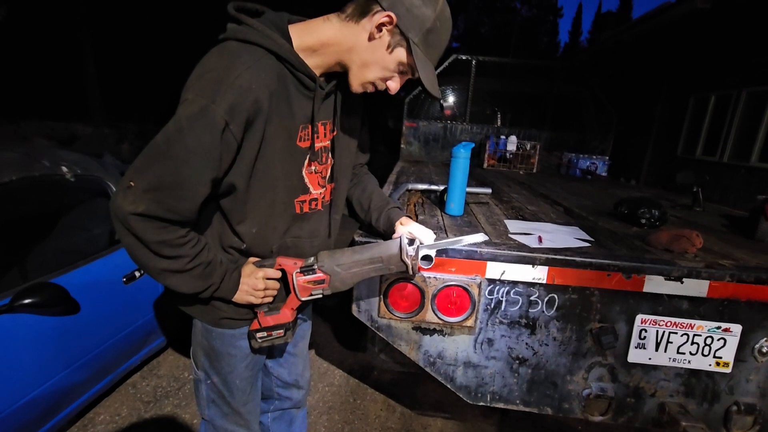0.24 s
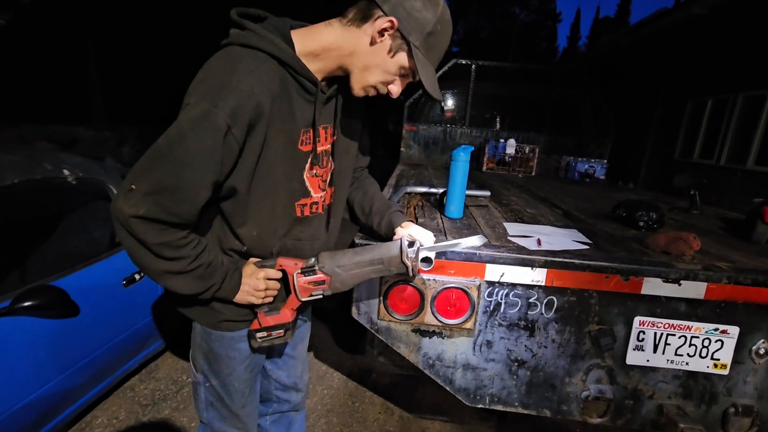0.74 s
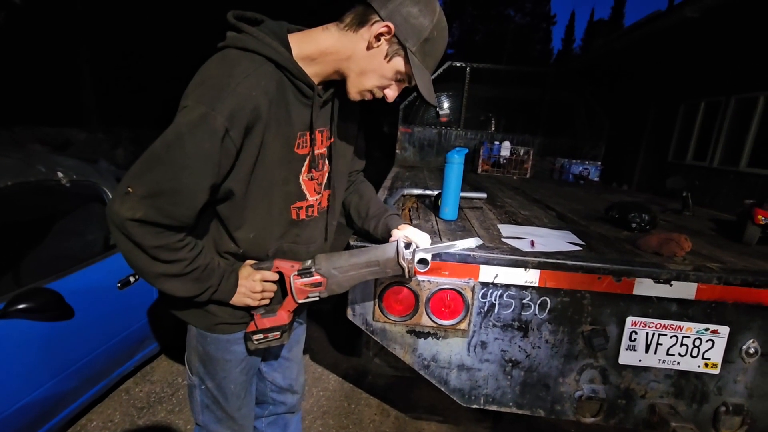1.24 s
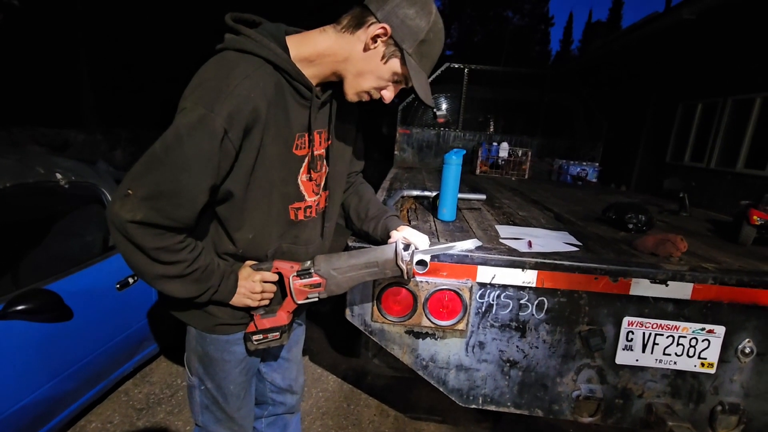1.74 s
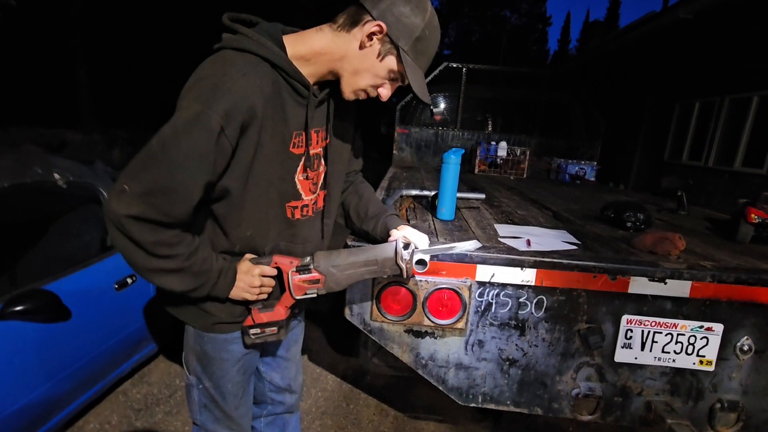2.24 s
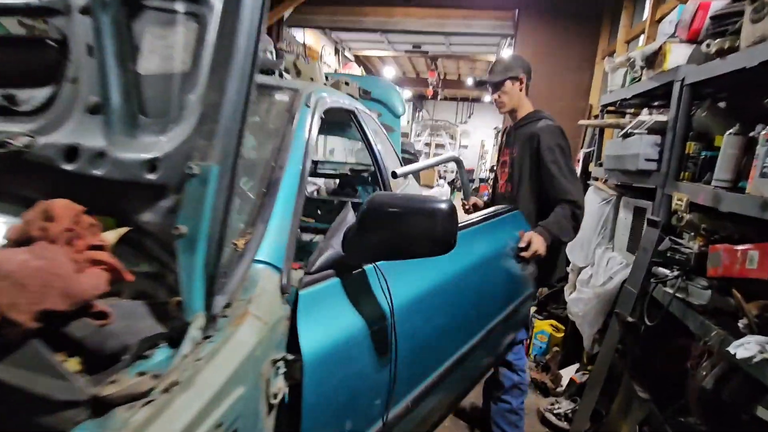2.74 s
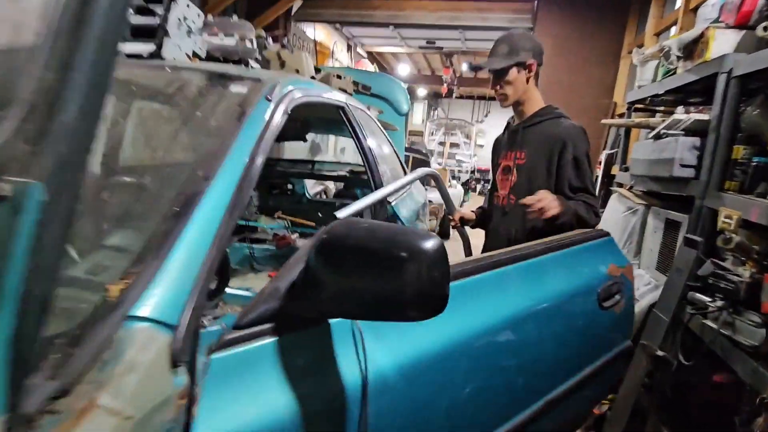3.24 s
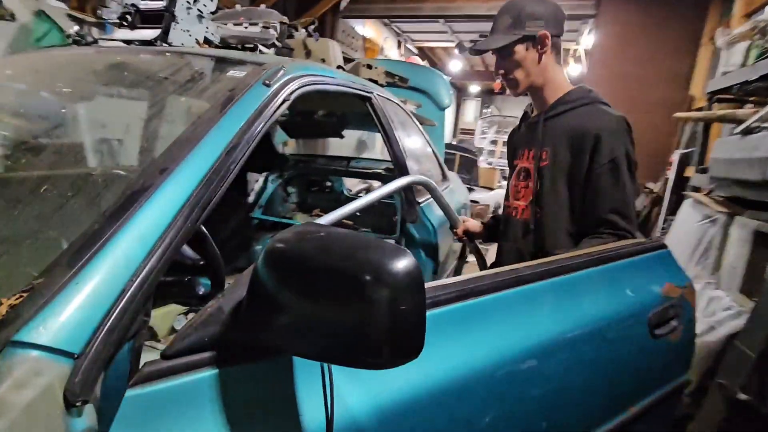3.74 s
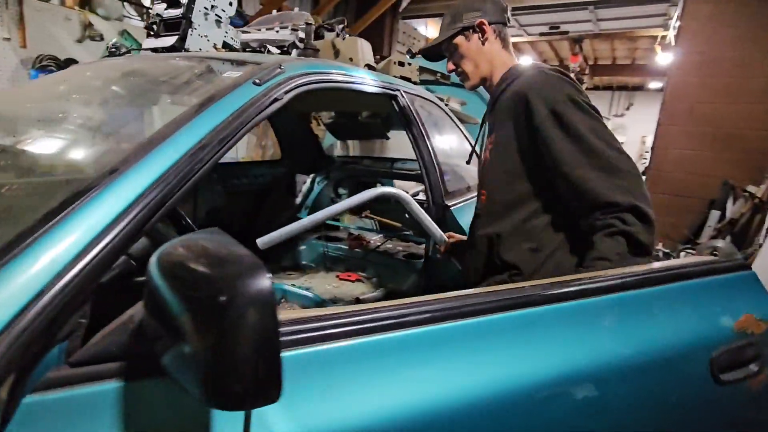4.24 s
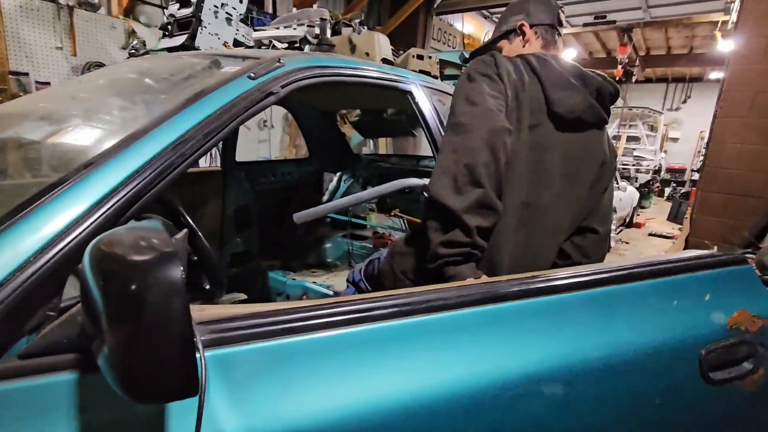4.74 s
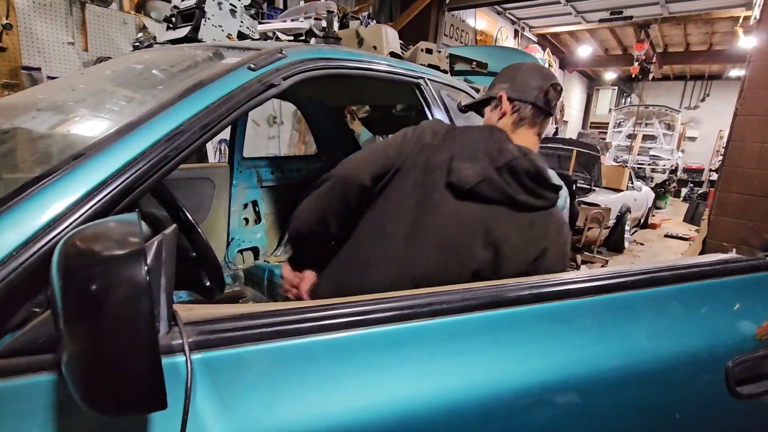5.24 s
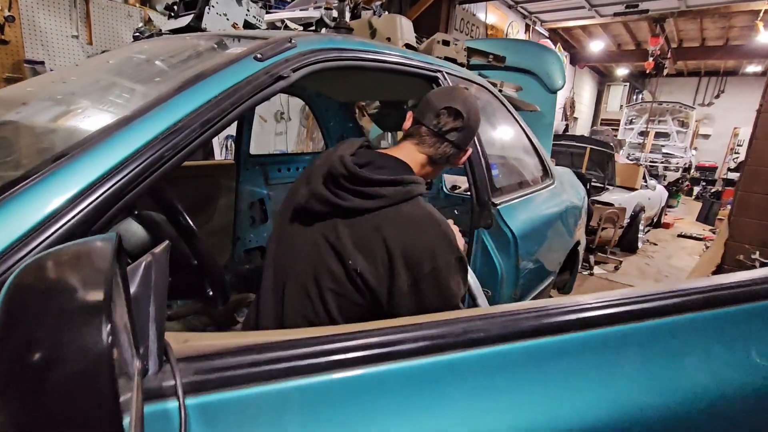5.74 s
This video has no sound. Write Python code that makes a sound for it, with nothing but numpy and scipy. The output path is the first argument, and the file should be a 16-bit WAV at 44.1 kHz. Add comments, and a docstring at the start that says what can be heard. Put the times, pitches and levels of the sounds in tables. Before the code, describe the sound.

Harsh, rapid sawing of metal cuts off suddenly to a low indoor rumble, cloth scuffs, small ticks and hollow car-body thumps.

```python
"""A reciprocating saw cuts a metal tube on a truck bed outdoors: stroke-timed bursts clack at each reversal,
grainy noise rasps between, extra cracks mark catches, and stroke-locked partials set tube and bed buzzing.
The scene changes abruptly to a quiet workshop: filtered noise and a sinking whine are a machine coasting down,
while someone shuffles (friction noise, ticks) to a stripped car and drops into it (ringing shell modes)."""
import sys
import numpy as np
from scipy import signal
from scipy.fft import rfft, irfft, next_fast_len
from scipy.io import wavfile

SR = 44100
rng = np.random.default_rng(int(sys.argv[2]) if len(sys.argv) > 2 else 0)


def generate_wav(sig):
    """Save sig (samples, or channels by samples) to the path in sys.argv[1] as 16-bit PCM at SR."""
    pcm = np.round(np.clip(np.atleast_2d(sig).T, -1, 1) * 32767).astype(np.int16)
    wavfile.write(sys.argv[1], SR, pcm)


N = 264153
T = np.arange(N) / SR
SIZE = next_fast_len(N + SR // 2, real=True) // 2 * 2
HZ = np.fft.rfftfreq(SIZE, 1 / SR)
CUT_S = 2.53  # the saw gives way to the workshop
# Colour of blade clacks and cracks [frequency_hz, relative_db]
CLACK_COLOUR = [(300, -12), (1200, -6), (2500, -14), (3800, -5.5), (4900, -2), (6000, -4), (7300, -1.5),
                (8700, -8), (11000, -4.5), (13800, -2.5), (15000, 3)]


def amp(db):
    """Decibels to gain."""
    return 10 ** (np.asarray(db) / 20)


def evened(x):
    """Scales to rms 1."""
    return x / np.sqrt(np.mean(x ** 2) + 1e-20)


def curves(rows):
    """Each column of a timed table, interpolated at every sample."""
    time_s, *columns = np.transpose(rows)
    return [np.interp(T, time_s, column) for column in columns]


def read(rows, hz, axis=1):
    """One column of a table, interpolated over log frequency."""
    columns = np.transpose(rows)
    return np.interp(np.log(hz + 1), np.log(columns[0] + 1), columns[axis])


def filtered(x, response):
    """Applies a response given on the HZ grid."""
    return irfft(rfft(x, SIZE) * response, SIZE)[..., :N]


def resonance(hz, width_hz):
    """Causal response of one mode, gain 1 at its centre."""
    return 1j * HZ * width_hz / (hz ** 2 - HZ ** 2 + 1j * HZ * width_hz)


def lifted(modes):
    """Response of a body whose modes stand out from the direct sound."""
    return 1 + sum((amp(lift_db) - 1) * resonance(hz, width_hz) for hz, width_hz, lift_db in modes)


def reach(hz, centre_hz, octaves):
    """Band that a blow excites: Gaussian over log frequency, octaves being its standard deviation."""
    return np.exp(-.5 * (np.log2((hz + 1) / centre_hz) / octaves) ** 2)


def drift(knots_per_half_s):
    """Random drift of rms 1, linear between independent knots."""
    knots = rng.standard_normal(SR)
    return evened(np.interp(2 * knots_per_half_s * T, np.arange(SR), knots))


def shaped_noise(size, colour):
    """Stereo noise of rms 1 with a given spectrum."""
    return evened(irfft(rfft(rng.standard_normal((2, size))) * colour, size))


def crack(level_db, decay_s, centre_hz, octaves):
    """A hard contact: a noise burst that starts at once and decays exponentially."""
    t = np.arange(SR // 25) / SR
    band = reach(np.fft.rfftfreq(len(t), 1 / SR), centre_hz, octaves)
    return amp(level_db) * np.exp(-t / decay_s) * shaped_noise(len(t), band)


def add(mix, start_s, sound):
    """Mixes a sound in at its start time."""
    part = mix[..., round(start_s * SR):][..., :sound.shape[-1]]
    part += sound[..., :part.shape[-1]]


def ports(pair):
    """Two unrelated signals become what two microphone ports pick up: partly alike, offset in phase."""
    # Likeness of the two sides [frequency_hz, likeness, left_lead_rad]
    port_rows = [(250, 0.98, -0.13), (600, 0.79, -0.33), (1200, 0.37, 0.36), (2100, 0.47, 1.13),
                 (3300, 0.1, 0.84), (4700, 0.32, -0.41), (5800, 0.38, 1.04), (7200, 0.44, 1.4),
                 (8700, 0.44, 3.02), (10500, 0.31, 3.23), (12700, 0.2, 1.33), (15000, 0.22, 1.18)]
    same = read(port_rows, HZ)
    shared = filtered(pair[0], same * np.exp(-1j * read(port_rows, HZ, axis=2)))
    return np.array([pair[0], shared + filtered(pair[1], np.sqrt(1 - same ** 2))])


def echoes(x, t60_rows):
    """Dense reflections, each band dying at its own speed; the bass is alike on both sides."""
    hz, t, z = signal.stft(rng.standard_normal((2, SR // 2)), SR, nperseg=256)
    z[1] = np.where(hz[:, None] < 400, z[0], z[1])
    decay = amp(-60 * t / read(t60_rows, hz)[:, None])
    tail = signal.istft(z * decay, SR, nperseg=256)[1]
    tail = np.pad(tail, ((0, 0), (SR // 400, 0)))  # 2.5 ms before the first reflection
    return signal.fftconvolve(x, tail / np.linalg.norm(tail[0]), axes=1)[:, :N]


def workshop_air(split_hz=450):
    """Low rumble and a wavering hum; a coasting machine's rush dies down while its whine sinks in pitch."""
    # Background colour [frequency_hz, relative_db]
    air_colour = [(15, -48), (25, -17), (49, -10.5), (69, 1), (86, -5.5), (129, -6), (156, -7.5),
                  (198, -7.5), (267, -11.5), (368, -16), (970, -29.5), (1660, -30), (2150, -31.5),
                  (2700, -40), (4000, -45), (8810, -59.5), (11200, -50.5), (15500, -59.5)]
    # Low rumble [time_s, level_db]
    rumble_rows = [(2.55, -50.5), (3.0, -49.5), (3.6, -52.5), (4.3, -50), (5.0, -47.5), (5.7, -52)]
    # Low hum [time_s, pitch_hz, level_db]
    hum_rows = [(2.53, 68, -51), (2.9, 63.4, -49), (3.7, 65.5, -60.5), (4.2, 59.5, -55.5),
                (4.7, 57.6, -46.5), (6, 57.6, -56)]
    # Room resonances that swell the whine [centre_hz, width_hz, lift_db]
    whine_swells = [(217.85, 13, 8.5), (192, 12.5, 12)]
    rush_db, rush_fall_db_per_s, rush_rest_db = -49.5, 10.5, -67.5
    whine_start_hz, whine_coast_s, whine_base_db = 257, 7.2, -61.5  # pitch falls to 1/e in whine_coast_s

    rumble_db, = curves(rumble_rows)
    coasted_s = np.maximum(T - CUT_S, 0)
    noise = ports(rng.standard_normal((2, N)))
    colour = amp(read(air_colour, HZ))
    low = 1 / (1 + (HZ / split_hz) ** 4)
    out = amp(rumble_db) * amp(1.1 * drift(6)) * evened(filtered(noise, colour * low))
    rush = np.hypot(amp(rush_db - rush_fall_db_per_s * coasted_s), amp(rush_rest_db))
    out += rush * evened(filtered(noise, colour * (1 - low)))

    whine_hz = whine_start_hz * np.exp(-coasted_s / whine_coast_s)
    whine_db = whine_base_db
    for centre_hz, width_hz, lift_db in whine_swells:
        whine_db = whine_db + lift_db / (1 + (2 * (whine_hz - centre_hz) / width_hz) ** 2)
    for pitch_hz, level_db in ((whine_hz, whine_db), curves(hum_rows)):
        tone = np.sqrt(2) * np.sin(2 * np.pi * np.cumsum(pitch_hz) / SR)
        out += amp(level_db) * amp(1.7 * drift(7)) * tone
    return out


def friction(tilt_db_per_octave, size):
    """Noise of rubbing cloth, its spectrum tilted about roughly 4 kHz."""
    # Colour of rubbing [frequency_hz, relative_db]
    rub_colour = [(240, -38), (400, -7.5), (481, -3), (535, -8), (873, -7), (1420, -4), (1590, -4),
                  (1880, -0.5), (5000, -4), (8800, -10.5), (11400, -8.5), (15500, -15.5)]
    hz = np.fft.rfftfreq(size, 1 / SR)
    colour = amp(read(rub_colour, hz) + tilt_db_per_octave * np.log2((hz + 200) / 4000))
    return shaped_noise(size, colour)


def scuffs(grain_db=1.0, catch_db=1.5, snags_per_s=120, snag=0.8):
    """Grainy friction that swells, snags and fades, each rub with its own brightness, over a faint background hiss."""
    # Abrupt rubs of shoes and clothes, and the dull noisy knock at 5.117 s [start_s, level_db,
    # tilt_db_per_octave]
    abrupt_rows = [(2.63, -57, -5.5), (3.015, -49.5, -7.5), (3.205, -51, -1.5), (3.245, -49, -1),
                   (3.57, -56.5, -8), (3.957, -48.5, -3.5), (4.344, -63.5, -1), (4.744, -64.5, -1.5),
                   (4.886, -43.5, 4), (5.117, -43.5, -13.5), (5.198, -60.5, 4.5), (5.371, -65.5, -2),
                   (5.855, -63, -3.5)]
    # Cloth sliding along the car [start_s, rise_s, fade_s, level_db, tilt_db_per_octave]
    slide_rows = [(2.801, 0.065, 0.13, -50.5, 4), (3.086, .02, 0.057, -56, -3.5),
                  (3.79, 0.03, .05, -65, -3), (3.92, 0.054, 0.055, -54, 0.5),
                  (4.39, 0.024, 0.048, -62, 5.5), (4.89, 0.07, 0.072, -43, -1.5),
                  (4.975, 0.031, 0.052, -48.5, 1), (5.70, 0.065, 0.063, -60, -2)]
    abrupt_rise_s, abrupt_fade_s = 0.0068, 0.043
    hiss_db, hiss_swell_db, hiss_tilt_db_per_octave = -79, 3.5, 3

    t = np.arange(SR // 2) / SR
    hiss = friction(hiss_tilt_db_per_octave, SIZE)[:, :N]
    out = amp(hiss_db + hiss_swell_db * drift(7.6)) * hiss
    rubs = [(s, abrupt_rise_s, abrupt_fade_s, db, tilt) for s, db, tilt in abrupt_rows]
    rubs += list(slide_rows)
    for start_s, rise_s, fade_s, level_db, tilt in rubs:
        fade = np.exp(-(np.maximum(t - rise_s, 0) / fade_s) ** 1.4)
        shape = np.minimum(t / rise_s, 1) * fade
        add(out, start_s, amp(level_db) * shape * friction(tilt, len(t)))
    snags = np.convolve(rng.random(N) < snags_per_s / SR, np.hanning(SR // 2000), "same")
    grain = amp(grain_db * drift(600) + catch_db * drift(54))
    return ports(out * grain * (1 + snag * snags))


def ticks():
    """Things being handled: small hard contacts, each a short band of noise."""
    # Ticks [start_s, level_db, centre_hz]
    tick_rows = [(3.018, -44, 4030), (3.248, -39.5, 4500), (3.96, -37.5, 3500), (4.345, -65, 5000),
                 (4.497, -54.5, 11000)]
    out = np.zeros((2, N))
    for start_s, level_db, centre_hz in tick_rows:
        add(out, start_s, crack(level_db, decay_s=0.0023, centre_hz=centre_hz, octaves=0.73))
    return ports(out)


def thumps(rattle_db=-24, rattle_s=0.026):
    """Knocks ring the car shell as thud, clatter and late boom, each with a puff of panel rattle."""
    # Modes of the car shell [frequency_hz, relative_db, t60_s]
    shell_modes = [(60.4, -6, 0.19), (119.23, 1, 0.16), (158.2, 13, 0.43), (169, 9, 0.37), (233, 9.5, 0.11),
                   (264, 0.5, 0.28), (370.5, 10, 0.058), (506, -2.5, 0.15), (786, -2, 0.041),
                   (880, -12, 0.068), (1037, -16, 0.085), (1370, -15, 0.082), (1448, -21, 0.11),
                   (1590, -14, 0.06)]
    # Knocks [start_s, thud_db, thud_hz, thud_spread_octaves, clatter_db, clatter_hz]
    knock_rows = [(3.017, -31.5, 121, 0.18, -30.5, 1430), (3.983, -39, 230, 0.15, -64, 1600),
                  (4.741, -25, 300, 0.47, -36, 790), (4.747, -19.5, 290, 0.56, -45, 700),
                  (4.772, -30.5, 337, 0.35, -57, 700), (5.114, -12.5, 211.4, 0.25, -32.5, 1090),
                  (5.16, -21, 178, 0.3, -46, 560), (5.227, -25, 190, 0.5, -44, 1000)]
    clatter_octaves = 0.32
    boom_hz, boom_octaves, boom_re_thud_db, boom_lag_s = 61.3, 0.22, -13.5, 0.0248

    t = np.arange(SR // 2) / SR
    hz = np.fft.rfftfreq(len(t), 1 / SR)
    modes = []
    for mode_hz, level_db, t60_s in shell_modes:
        decay = np.exp(-np.log(1000) * t / t60_s)
        modes.append((mode_hz, amp(level_db) * decay * np.sin(2 * np.pi * mode_hz * t)))
    rings, rattles = np.zeros(N), np.zeros((2, N))
    for start_s, thud_db, thud_hz, thud_octaves, clatter_db, clatter_hz in knock_rows:
        parts = [(start_s, thud_db, thud_hz, thud_octaves),
                 (start_s, clatter_db, clatter_hz, clatter_octaves),
                 (start_s + boom_lag_s, thud_db + boom_re_thud_db, boom_hz, boom_octaves)]
        for part_s, level_db, centre_hz, octaves in parts:
            ring = sum(reach(mode_hz, centre_hz, octaves) * mode for mode_hz, mode in modes)
            rattle = shaped_noise(len(t), reach(hz, centre_hz, octaves))
            contact = amp(level_db) * (1 - np.exp(-(t / 0.003) ** 2))  # a padded blow builds up softly
            add(rings, part_s, contact * ring / abs(ring).max())
            add(rattles, part_s, contact * amp(rattle_db) * rattle * np.exp(-t / rattle_s))
    return rings + ports(rattles)


def swing(turns):
    """Hum of the moving mass: wavering sines at multiples of the stroke rate."""
    # Hum partials [stroke_rate_multiple, level_db, waver_db]
    swing_rows = [(2, -18.5, 1.5), (3, -19, 2.5)]
    out = np.zeros(N)
    for multiple, level_db, waver_db in swing_rows:
        tone = np.sqrt(2) * np.sin(2 * np.pi * (multiple * turns + rng.random()))
        out += amp(level_db + waver_db * drift(3.0)) * tone
    return out


def buzz(turns, wander_hz, waver_db=2.0, count=38):
    """Rattling tied to the stroke: multiples of its rate, each wandering in pitch and level."""
    def partial(k):
        """One multiple of the stroke rate."""
        wander = np.cumsum(wander_hz * drift(11)) / SR
        tone = np.cos(2 * np.pi * (k * turns + rng.random() + wander))
        return amp(waver_db * drift(5)) * tone
    return evened(np.array([sum(partial(k) for k in range(3, count)) for side in "LR"]))


def shaking(turns, rattle, jolt=0.7, uneven_db=3.0, slop=0.02, surge_db=0.32, pull=0.065):
    """Jolts of each stroke and the buzz, strongest on the pull, drive the low modes of the bed."""
    # Colour of the shaken bed [frequency_hz, relative_db]
    bed_colour = [(10, -60.5), (30, -34.5), (60, -20.5), (85, -11), (110, -12.5), (145, -9), (190, -4),
                  (235, -2.5), (270, -2), (298, -4.5), (325, -17.5), (400, -21.5), (800, -37)]
    # Modes of the bed [centre_hz, width_hz, lift_db]
    bed_modes = [(213, 14, 8), (260, 16, 3.5), (447, 14, 14)]
    # The saw's shoe bumping the tube [share_of_stroke, relative_db]
    jolt_rows = [(.85, 0), (.12, -1), (.3, -5)]
    jolts = np.zeros(N)
    for share, level_db in jolt_rows:
        size = amp(level_db + uneven_db * drift(22))
        jolts += size * np.diff(np.floor(turns - share + slop * drift(16.5)), prepend=0)
    colour = amp(read(bed_colour, HZ)) * lifted(bed_modes)
    swell = (1 + pull * np.cos(2 * np.pi * turns)) * amp(surge_db * drift(5.4))
    return jolt * evened(filtered(jolts * swell, colour)) + evened(filtered(rattle * swell, colour))


def bump(turns, share, width):
    """A smooth hump of height 1 at the same share of every stroke."""
    return np.exp(-.5 * (((turns - share + .5) % 1 - .5) / width) ** 2)


def chatter(turns, rattle, pull=0.92, back=0.96, uneven_db=4.5):
    """The tube rings with the buzz, flaring after each reversal of the blade."""
    # Colour of the tube [frequency_hz, relative_db]
    tube_colour = [(380, -30.5), (480, -11.5), (540, 0), (620, 0.5), (680, -7.5), (790, -5), (880, -21)]
    # Modes the chatter rings most [centre_hz, width_hz, lift_db]
    tube_modes = [(538, 14, 2), (617, 13, 4)]
    reversals = pull * bump(turns, .12, 0.072) + back * bump(turns, .48, .05)
    flare = 1 + amp(uneven_db * drift(16)) * reversals
    return filtered(rattle * flare, amp(read(tube_colour, HZ)) * lifted(tube_modes))


def teeth(turns, grain_db=1.5, judder_db=1.5, slow_share=0.87, slow_width=0.14, dulling=0.38,
          bright_hz=3000, chips_per_s=110, chip=.9, chip_s=0.00067):
    """Teeth rasp and tear off chips of uneven size; the rasp dulls as the blade slows before its reversal."""
    # Colour of the rasp [frequency_hz, relative_db]
    rasp_colour = [(200, -22), (350, -13), (470, -11), (560, -10), (650, -9), (900, -10), (1100, -8),
                   (1850, -11), (2150, -10), (2450, -11.5), (4800, -11.5), (7300, -15.5), (8700, -20.5),
                   (12000, -15.5), (15200, -28)]
    chips = (rng.random(N) < chips_per_s / SR) * np.minimum(rng.exponential(1, N), 2)
    torn = signal.lfilter([1], [1, -np.exp(-1 / (chip_s * SR))], chips)
    roughness = amp(grain_db * drift(900) + judder_db * drift(77)) + chip * torn
    grit = roughness * rng.standard_normal((2, N))
    colour = amp(read(rasp_colour, HZ))
    treble = HZ ** 4 / (HZ ** 4 + bright_hz ** 4)
    slowing = bump(turns, slow_share, slow_width)
    return filtered(grit, colour) - dulling * filtered(grit * slowing, colour * treble)


def clacks(turns, scatter_db=1.5):
    """The blade slams over at each end of its travel and the tube chatters after it, in noise bursts."""
    # Impacts in each stroke [share_of_stroke, relative_db, decay_s, centre_hz, spread_octaves]
    impact_rows = [(.006, .3, .0016, 6800, 1), (.02, 5, .0026, 1350, .72), (.04, -12, .008, 7500, 1.2),
                   (.11, -3.5, .003, 3000, 1), (.165, 1, .002, 1300, .65), (.455, -.5, .0018, 1600, .7),
                   (.545, -7.5, .0017, 8000, .8)]
    t = np.arange(SR // 25) / SR
    out = np.zeros((2, N))
    strokes = np.arange(1, np.interp(CUT_S, T, turns))
    for share, level_db, decay_s, centre_hz, octaves in impact_rows:
        times_s = np.interp(strokes + share, turns, T)
        shape = np.exp(-t / decay_s) * (1 - np.exp(-t / .00022))
        bursts = np.zeros(N)
        for time_s, (late, size) in zip(times_s, rng.standard_normal((len(times_s), 2))):
            time_s += .002 * share * late  # later rebounds are looser in time
            add(bursts, time_s, amp(level_db + scatter_db * size) * shape)
        colour = amp(read(CLACK_COLOUR, HZ)) * reach(HZ, centre_hz, octaves)
        out += filtered(bursts * rng.standard_normal((2, N)), colour)
    return out


def catches():
    """The blade catches in the cut and cracks harder: short coloured bursts."""
    # Catches [start_s, level_before_colouring_db]
    catch_rows = [(.0362, -8.5), (.0815, -13), (0.128, -11), (.173, -15), (.3105, -12), (.449, -16.5),
                  (.494, -14.5), (0.582, -8), (0.628, -3.5), (.6702, -14.5), (.715, -13.5), (0.756, -13.5),
                  (0.8015, -3.5), (.8425, -10), (.9275, -12), (1.012, -9.5), (1.097, -9.5), (1.137, -6),
                  (1.181, -10.5), (1.264, -11.5), (1.306, -13), (1.349, -11.5), (1.39, -12.5),
                  (1.8497, -12.5), (2.186, -7.5), (2.228, -12), (2.27, -13), (2.3107, -10.5),
                  (2.3546, -6.5), (2.3962, -8.5), (2.4817, -7)]
    cracks = np.zeros((2, N))
    for start_s, level_db in catch_rows:
        add(cracks, start_s, crack(level_db, decay_s=0.0016, centre_hz=5500, octaves=1.25))
    return filtered(cracks, amp(read(CLACK_COLOUR, HZ)))


def saw():
    """Clacks, catches and rasp ring the metal, over chattering tube, shaking bed and hum of the moving mass."""
    # Motor labours as the blade starts its groove, then runs up [time_s, strokes_per_s]
    speed_rows = [(0, 22.043), (0.42, 21.575), (0.6, 23.013), (1.0, 23.69), (1.65, 24.056), (2.3, 23.609)]
    # Feed into the tube and shaking of the bed [time_s, push_db, shaking_db]
    feed_rows = [(0, -2.5, -27.5), (.38, -2.5, -27.5), (.6, 1, -26), (.88, -0.55, -26), (1.15, 0, -22.5),
                 (1.35, -1.33, -25), (1.49, -0.5, -26), (1.6, -3.5, -26), (2.05, -2, -28.5),
                 (2.21, 0, -25.5), (2.52, 0.1, -20.5)]
    # Modes of blade, tube and gear case [centre_hz, width_hz, lift_db]
    metal_modes = [(447, 14, 2.5), (538, 14, 6.2), (617, 13, 10), (983, 14, 4), (1092, 15, 5),
                   (1215, 20, 3), (1368, 19, 5.5), (1558, 20, 3.3), (1630, 23, 4), (2003, 20, 7),
                   (2100, 18, 6), (2153, 30, 6), (2240, 40, 3), (2631, 30, 4), (2912, 30, 4.7),
                   (3286, 35, 4), (3513, 35, 3), (3850, 30, 4.5), (4016, 38, 5.5), (4404, 35, 3.6),
                   (4610, 38, 7.3), (4877, 50, 5.5), (4985, 30, 3.5), (6449, 40, 6), (7117, 45, 6.5),
                   (7272, 45, 7.6), (11025, 50, 5), (14662, 50, 5)]
    # Tube chattering in the hand as the blade bites and lets go [time_s, level_db]
    chatter_rows = [(0, -38), (.15, -29), (.38, -31.5), (.5, -24.5), (.85, -26.5), (.9, -33), (.98, -24.5),
                    (1.2, -28), (1.4, -30.5), (1.55, -26.5), (1.8, -29.5), (2.05, -30), (2.22, -26),
                    (2.33, -33), (2.45, -26.5)]
    # level at a push of 0 dB, and dB gained per dB of push
    clack_db, clack_follow = -22, 2
    rasp_db, rasp_follow = -21, 0.91
    swing_db, swing_follow = -25, 2
    wander_hz, wander_follow = 8.02, 2.2  # unsteadiness of the buzz
    start_share, yard_db = .21, -15  # progress of the first stroke at 0 s; reflections of truck and ground

    rate, = curves(speed_rows)
    turns = start_share + np.cumsum(rate) / SR
    push_db, shake_db = curves(feed_rows)
    chatter_db, = curves(chatter_rows)

    def played(x, level_db):
        """Sets a layer to its level curve."""
        return amp(level_db) * x / np.std(x[..., T < CUT_S])

    metal = lifted(metal_modes)
    cutting = played(filtered(clacks(turns), metal), clack_db + clack_follow * push_db)
    cutting += played(filtered(teeth(turns), metal), rasp_db + rasp_follow * push_db)
    cutting += filtered(catches(), metal)
    rattle = buzz(turns, wander_hz * amp(wander_follow * push_db))
    bed = played(shaking(turns, rattle), shake_db)
    tube = played(chatter(turns, rattle), chatter_db)
    near = ports(cutting + bed + tube)
    yard = echoes(ports(cutting), [(200, 0.025), (2000, 0.046), (12000, 0.0086)])  # (Hz, t60 s)
    hum = amp(swing_db + swing_follow * push_db) * swing(turns)
    return near + amp(yard_db) * yard + hum


def scene():
    """The saw outdoors, then the workshop, with a 1 ms crossfade."""
    # Workshop reverberation [frequency_hz, t60_s]
    room_t60 = [(100, 0.38), (1000, 0.46), (5000, 0.25), (15000, 0.095)]
    moves = scuffs() + ticks() + thumps()
    indoors = moves + amp(-5.0) * echoes(moves, room_t60) + workshop_air()
    outdoors = np.clip((CUT_S - T) / .001, 0, 1)
    return outdoors * saw() + (1 - outdoors) * indoors


def record(dry, knee=0.45):
    """Peaks above the knee are rounded off towards full scale, then low-passed."""
    excess = np.maximum(abs(dry) - knee, 0)
    rounded = np.sign(dry) * (abs(dry) - excess + (1 - knee) * np.tanh(excess / (1 - knee)))
    edge = signal.firwin(221, 15650, window=("kaiser", 9), fs=SR)  # cutoff in Hz
    return signal.oaconvolve(rounded, edge[None], "same", axes=1)


dry = scene()
out = record(dry)
generate_wav(out)
```